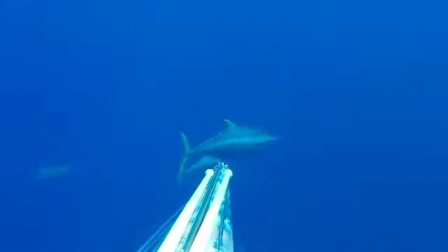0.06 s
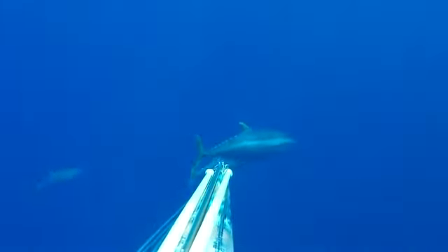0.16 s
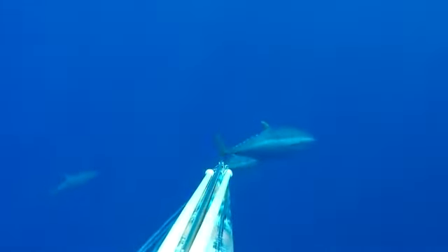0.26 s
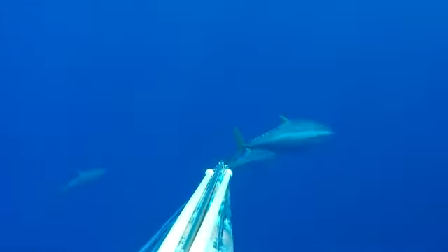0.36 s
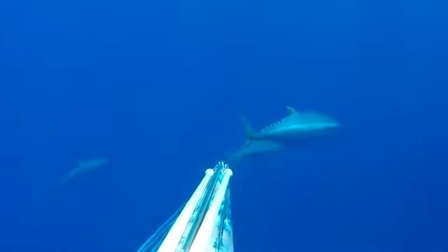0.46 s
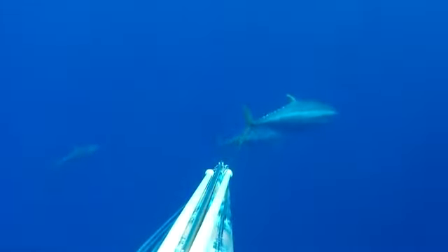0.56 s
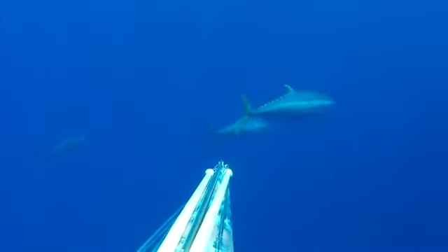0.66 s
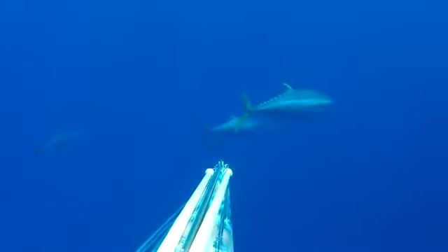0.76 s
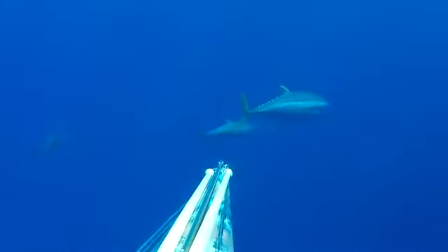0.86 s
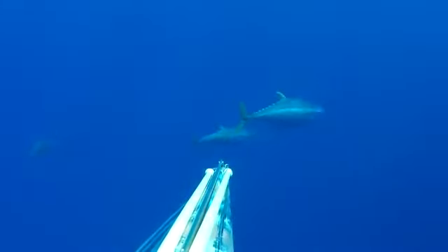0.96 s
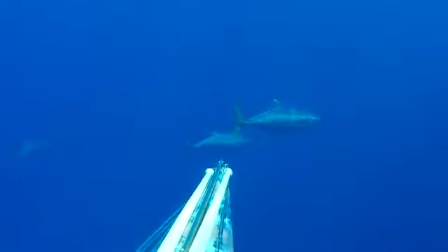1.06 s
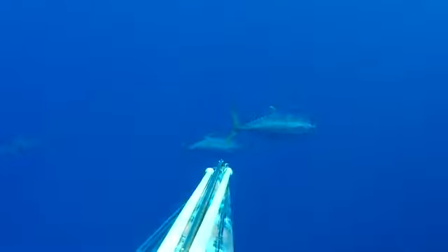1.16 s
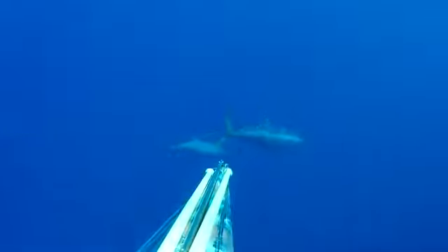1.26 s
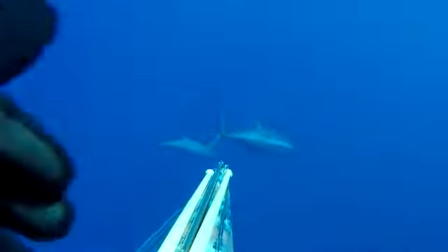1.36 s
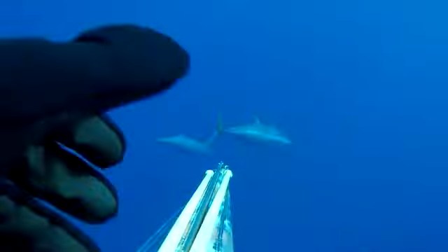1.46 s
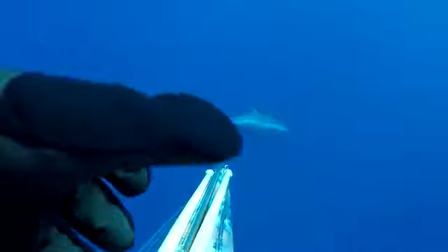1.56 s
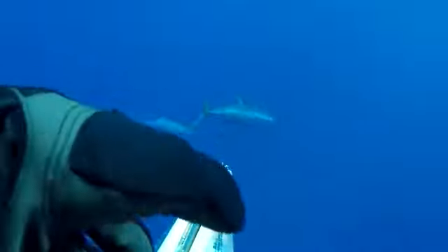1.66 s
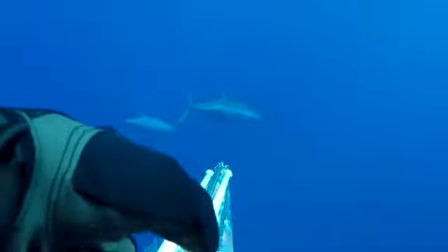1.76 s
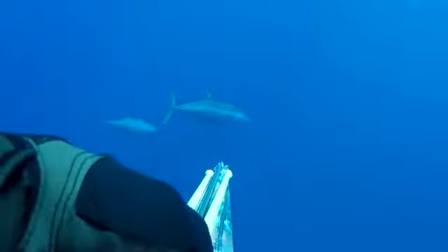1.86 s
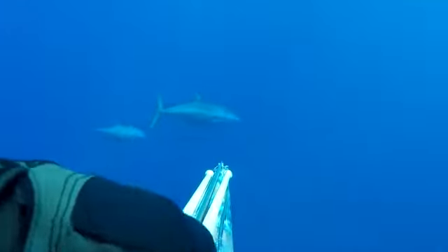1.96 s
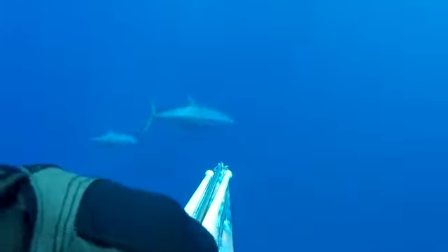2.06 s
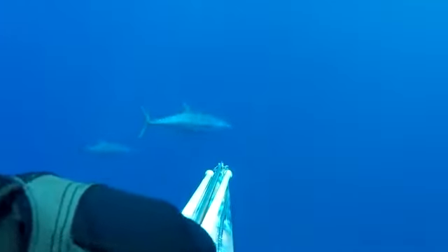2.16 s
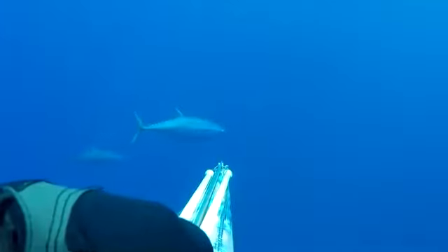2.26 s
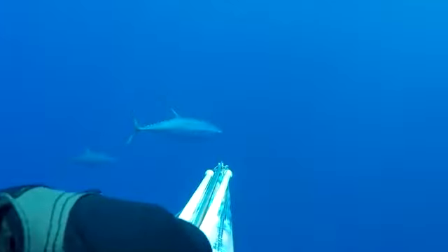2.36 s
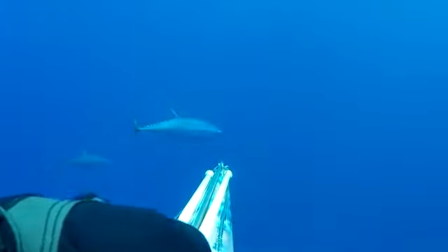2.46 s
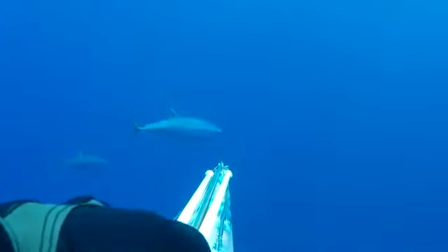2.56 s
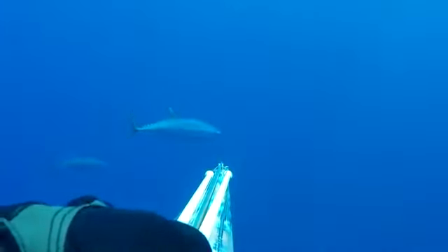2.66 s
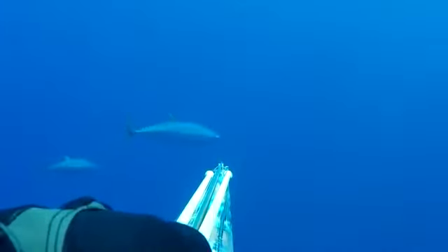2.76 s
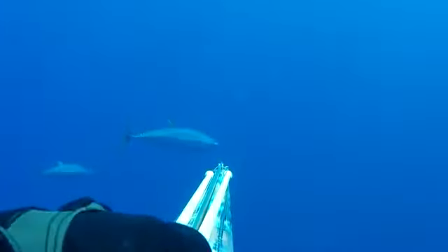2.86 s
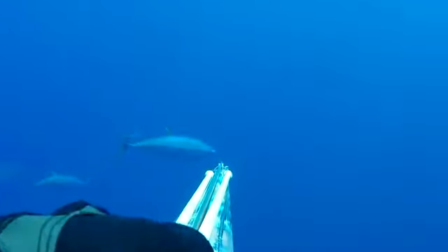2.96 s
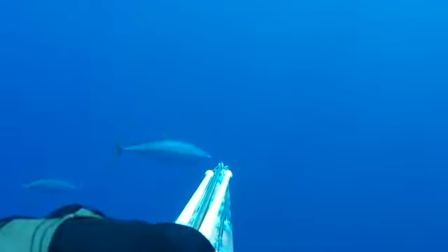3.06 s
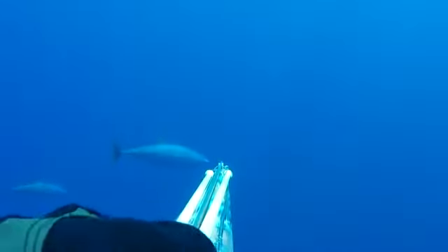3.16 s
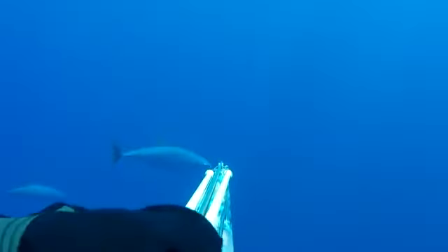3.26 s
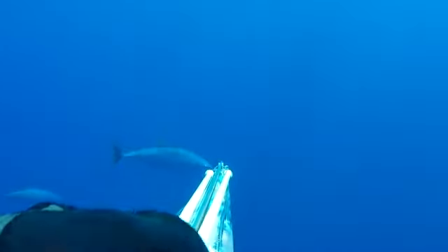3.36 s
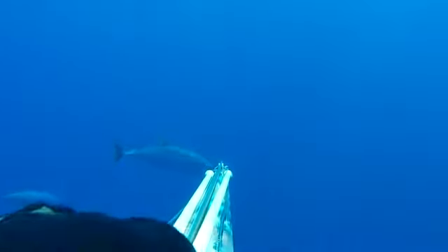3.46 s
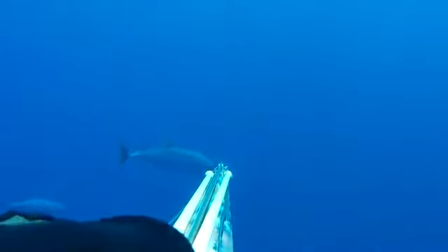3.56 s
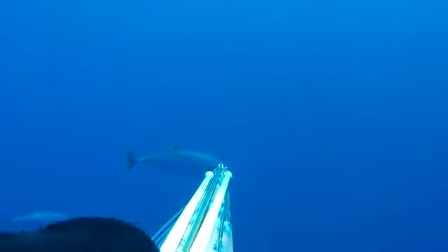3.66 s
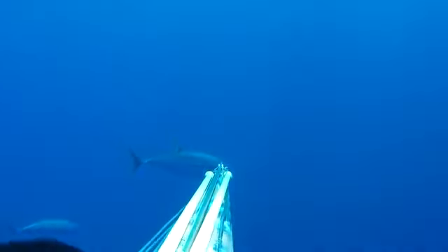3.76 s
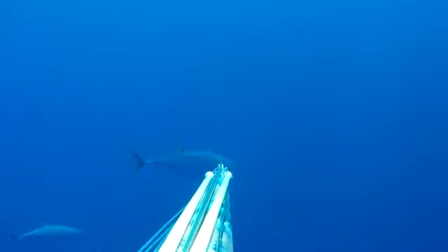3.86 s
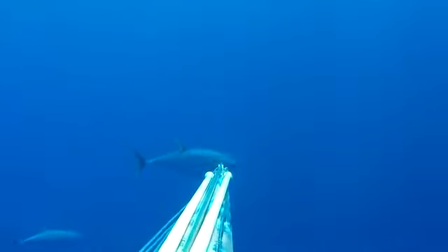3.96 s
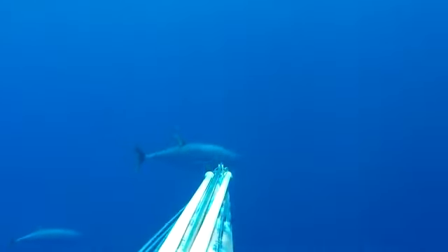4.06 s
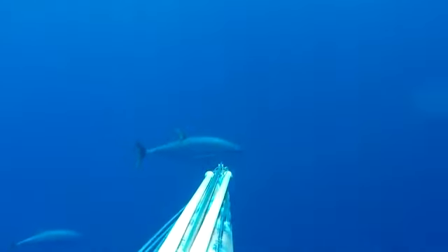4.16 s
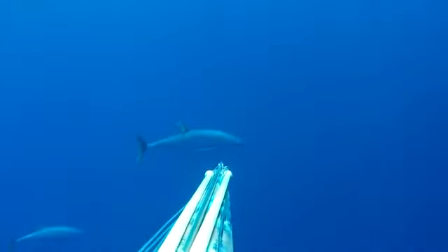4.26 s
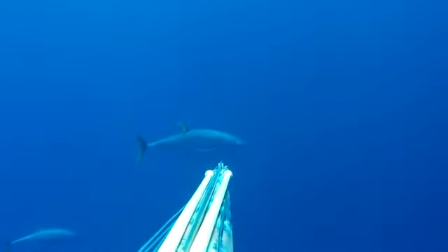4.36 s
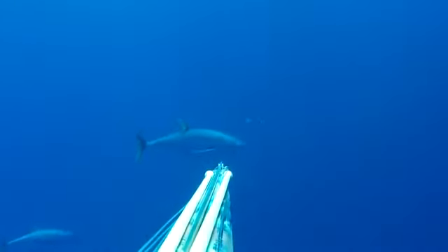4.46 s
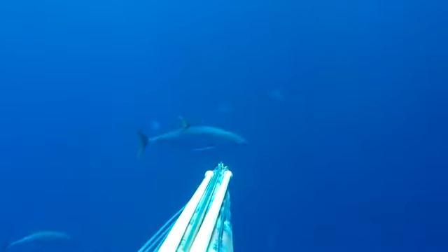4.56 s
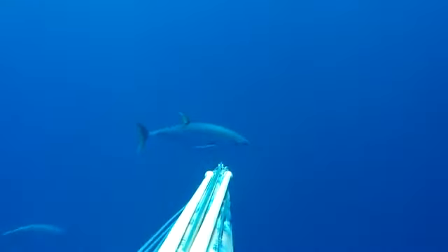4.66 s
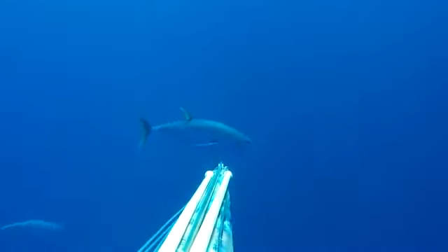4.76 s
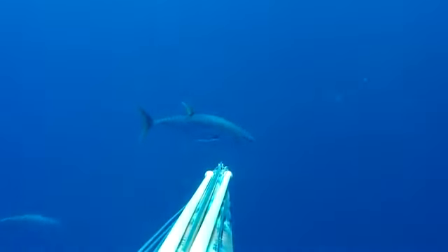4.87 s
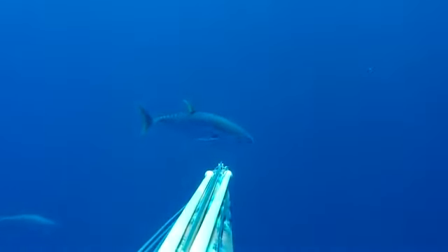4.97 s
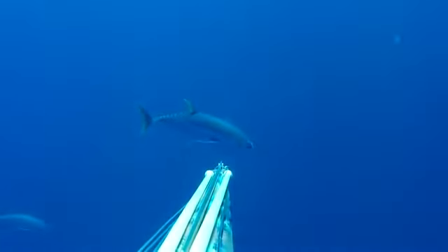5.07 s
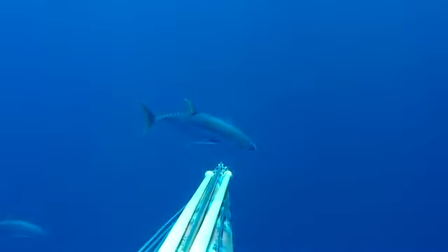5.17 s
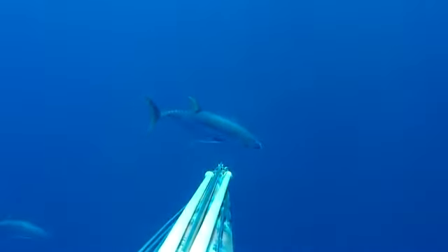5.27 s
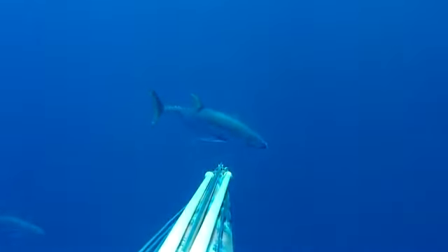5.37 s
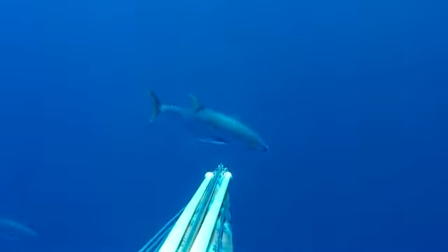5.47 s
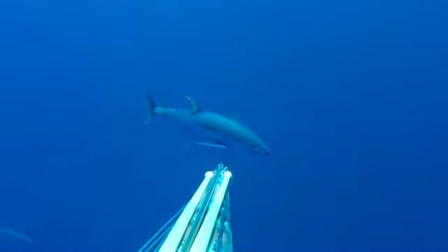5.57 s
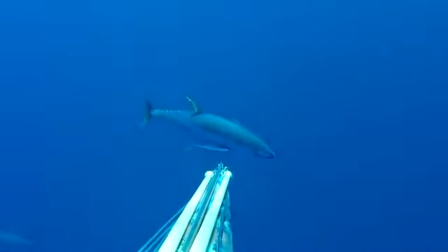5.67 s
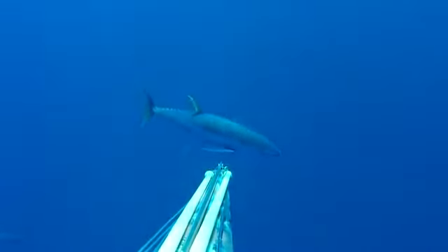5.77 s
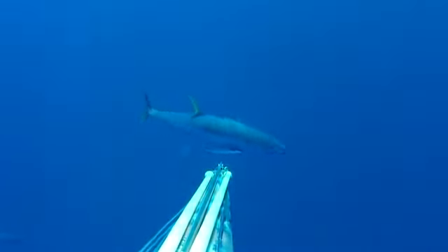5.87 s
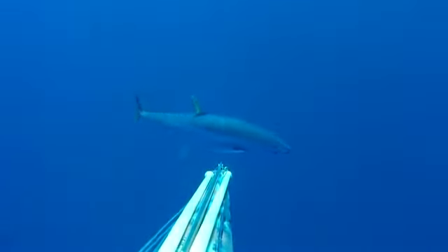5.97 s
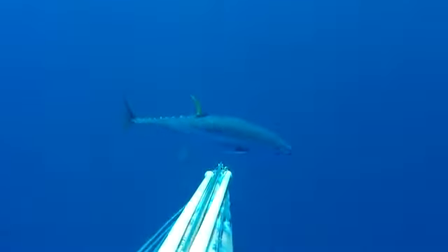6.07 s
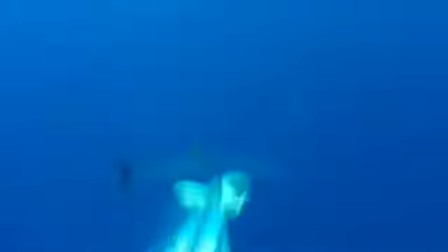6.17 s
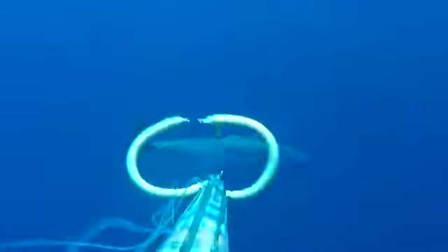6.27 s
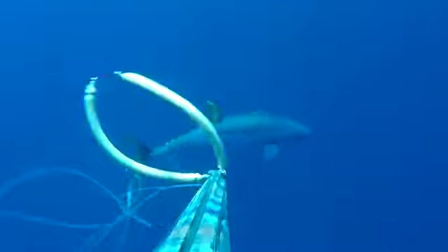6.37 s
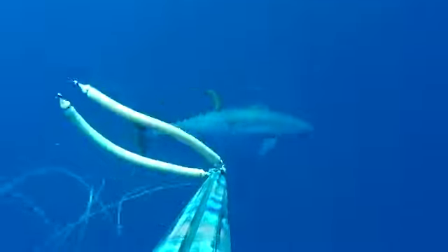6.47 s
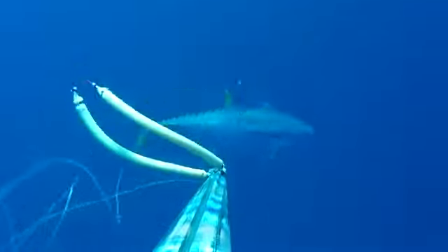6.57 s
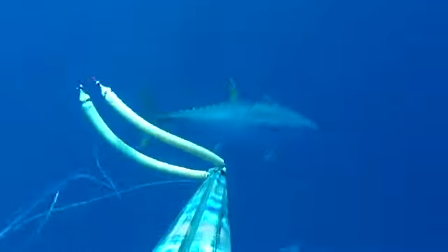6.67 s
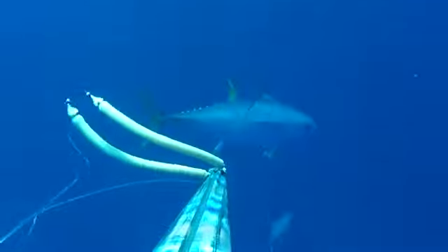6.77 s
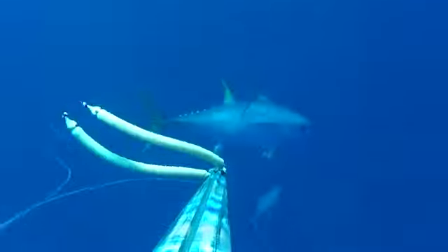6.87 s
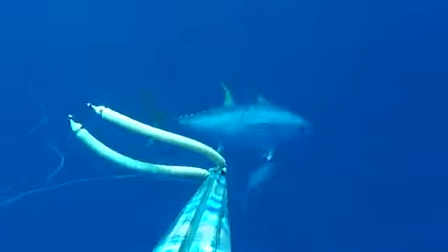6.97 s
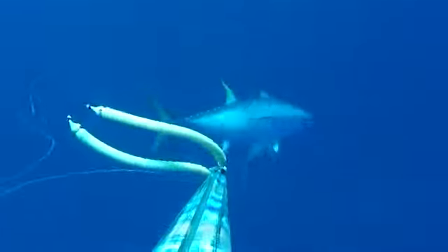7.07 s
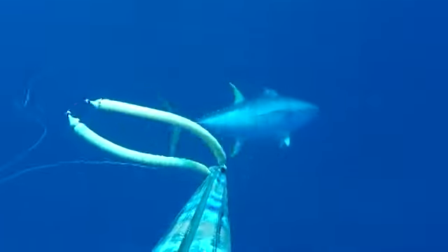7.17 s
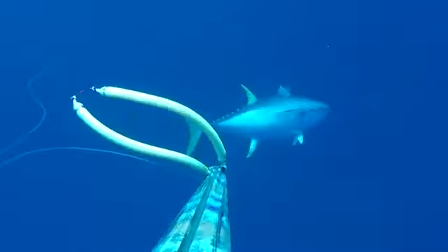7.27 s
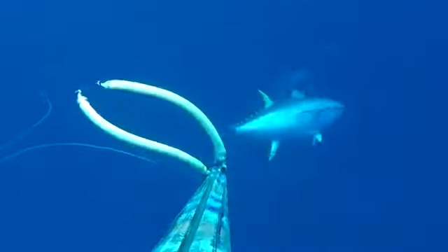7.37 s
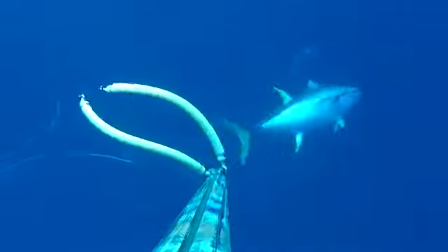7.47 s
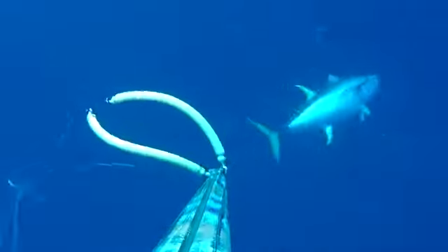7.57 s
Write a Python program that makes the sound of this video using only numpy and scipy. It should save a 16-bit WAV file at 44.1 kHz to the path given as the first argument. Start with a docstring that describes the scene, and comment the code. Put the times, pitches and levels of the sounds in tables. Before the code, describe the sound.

Low underwater rumble with small crackles and close glove knocks, then a speargun fires with a loud crack and a clacking rattle.

```python
"""Open water, below the surface: a diver aims a speargun, the microphone in a sealed housing on the gun.
Flow rumbles and gurgles on the housing; farther out the sea hisses, crackles and snaps through its wall.
Right at the microphone a gloved hand knocks and rubs the gun, among dull thuds and bubble-like pings.
The trigger clicks, the spear tears along the barrel, the gun kicks, and loose bands and line clack.
The shot overloads the recorder, whose gain control ducks everything and slowly recovers."""
import sys
import numpy as np
from scipy import signal
from scipy.fft import rfft, irfft, next_fast_len
from scipy.io import wavfile
from scipy.ndimage import uniform_filter1d, minimum_filter1d

SR = 44100
rng = np.random.default_rng(int(sys.argv[2]) if len(sys.argv) > 2 else 0)


def output_pcm(signal):
    """Save a mono or channel-first signal as 16-bit PCM at the path in sys.argv[1].

    Samples are clipped to [-1, 1] before scaling.
    """
    pcm = np.clip(np.atleast_2d(signal).T, -1, 1) * 32767
    wavfile.write(sys.argv[1], SR, np.round(pcm).astype(np.int16))


N = 336036
KNOCK_SAMPLES = 6000

# Modes of gun and housing. Each row: pitch in Hz, relative level in dB, free ring time (t60) in seconds.
GUN_MODES = [(358, -23, 0.072), (484, -18.5, 0.0073), (646, -6.5, 0.22), (736, -5, 0.1), (944, -13, 0.18),
             (994, -6, 0.092), (1230, -21.5, 0.011), (1550, 2.5, 0.022), (1770, 4, 0.042),
             (1950, -2, 0.025), (2250, -10, 0.024), (2900, -4.5, 0.035), (3130, -12, 0.061),
             (3920, -12.5, 0.026), (4600, -28, 0.0052), (5950, -26.5, 0.042), (6800, -31.5, 0.014),
             (8500, -33.5, 0.0065), (10500, -35, 0.006), (12980, -31, 0.005)]
# Knocks, rubs and tearing are kept above the gun's first modes, and the housing dulls their top.
GUN_BAND = signal.butter(2, [560, 9000], "band", fs=SR, output="sos")


def from_db(db):
    """Gain of a level in dB."""
    return 10 ** (np.asarray(db, float) / 20)


def rms_one(x):
    """Scale to rms 1."""
    return x / np.sqrt(np.mean(x ** 2) + 1e-20)


def add(out, s, sound):
    """Mix a short sound in at s seconds."""
    at = round(s * SR)
    out[at:at + len(sound)] += sound[:N - at]


def in_time(rows):
    """Columns of a curve table, one value a sample."""
    s, *columns = np.transpose(rows)
    return [np.interp(np.arange(N) / SR, s, c) for c in columns]


def coloured(x, spectrum):
    """Give a white signal a spectrum, by the causal filter of least delay; rms 1."""
    hz, db = np.transpose(spectrum)
    size = 2 * next_fast_len(N // 2 + 1, True)
    log_hz = np.log(np.arange(size // 2 + 1) * SR / size + 1e-3)
    gain = from_db(np.interp(log_hz, np.log(hz), db, -70, -70))
    cepstrum = irfft(np.log(gain), size)
    cepstrum[1:size // 2] *= 2
    cepstrum[size // 2 + 1:] = 0
    return rms_one(irfft(rfft(x, size) * np.exp(rfft(cepstrum)), size)[:N])


def drift(rate_hz):
    """Slow random wander of spread 1."""
    r = np.exp(-80 * np.pi * rate_hz / SR)   # one step every 40 samples
    slow = signal.lfilter([1], [1, -2 * r, r * r], rng.standard_normal(N // 40 + 2002))[2000:]
    return np.interp(np.arange(N) / 40, np.arange(len(slow)), rms_one(slow))


def grains(per_s, spread_db):
    """Random clicks, most small and a few large; rms 1."""
    sizes = from_db(spread_db * np.minimum(rng.exponential(1, N), 4))
    signs = np.sign(rng.standard_normal(N))
    return rms_one(sizes * signs * (rng.random(N) < per_s / SR))


def ring(clicks, hz, t60):
    """A unit click sets a sine of height 1 ringing."""
    r, w = from_db(-60 / (t60 * SR)), 2 * np.pi * hz / SR
    return signal.lfilter([0, np.sin(w)], [1, -2 * r * np.cos(w), r * r], clicks + 1e-18)


def through_wall(x):
    """The housing wall passes little at its antiresonances: each cuts a narrow dip."""
    # Each row: centre in Hz, width in Hz, depth in dB.
    dips = [(1950, 120, -12), (3390, 150, -14), (4250, 350, -7), (5150, 250, -7), (5580, 160, -8),
            (6400, 400, -6), (7900, 500, -5)]
    for hz, width_hz, db in dips:
        x = x - (1 - from_db(db)) * signal.lfilter(*signal.iirpeak(hz, hz / width_hz, SR), x)
    return x


def knocks(rows, chatter_ms):
    """Contacts chatter into randomly detuned modes; each knock has its level, ring length and colour."""
    out, age = np.zeros(N), np.arange(KNOCK_SAMPLES) / SR
    hz, mode_db, t60 = np.transpose(GUN_MODES)[:, :, None]
    for s, peak_db, db_per_octave, ring_share, centre_hz in rows:
        strength, detune = rng.standard_normal((2, len(hz), 1))
        colour_db = db_per_octave * np.log2(hz / 1000) + 3 * strength
        if centre_hz:
            colour_db -= 22 * np.log2(hz / centre_hz) ** 2   # 22 dB down an octave away
        fading = from_db(mode_db + colour_db - 60 * age / (t60 * ring_share))
        modes = np.sum(np.sin(2 * np.pi * hz * (1 + .015 * detune) * age) * fading, axis=0)
        touch = rng.standard_normal(KNOCK_SAMPLES)
        chatter = touch * np.abs(touch) * age ** .3 * np.exp(-2000 * age / chatter_ms)
        knock = signal.sosfilt(GUN_BAND, signal.fftconvolve(chatter, modes)[:KNOCK_SAMPLES])
        add(out, s, from_db(peak_db) * knock / np.abs(knock).max())
    return out


def struck(rows, rise_cycles, rough):
    """Each row sets one mode swinging; it needs a moment to build up, and a rough one flutters."""
    out, age = np.zeros(N), np.arange(SR) / SR
    for s, db, hz, t60 in rows:
        rise = 1 - np.exp(-age * hz / rise_cycles)
        flutter = 1 + rough * rms_one(uniform_filter1d(rng.standard_normal(SR), size=110))
        add(out, s, rise * flutter * from_db(db - 60 * age / t60) * np.sin(2 * np.pi * hz * age))
    return out


def scrape(rows, contacts, attack_s, release_s, ring_share=1):
    """Strokes swell and fade, feeding contacts into the modes; returns ringing and bare contacts."""
    ringing, bare = np.zeros(N), np.zeros(N)
    for s, length_s, level_db, db_per_octave in rows:
        stroke = contacts[round(s * SR):round((s + length_s) * SR) + 2 * KNOCK_SAMPLES]
        age = np.arange(len(stroke)) / SR
        swell = np.minimum(age / attack_s, 1) * np.exp(-np.maximum(age - length_s, 0) / release_s)
        stroke = stroke * from_db(level_db) * swell
        add(bare, s, stroke)
        for hz, db, t60 in GUN_MODES:
            gain = from_db(db + db_per_octave * np.log2(hz / 1000))
            add(ringing, s, gain * ring(stroke, hz, ring_share * t60))
    return signal.sosfilt(GUN_BAND, signal.sosfilt(GUN_BAND, ringing)), bare


def water_flow():
    """Water passing right over the housing: a surging rumble, a patchy wash and a gurgle."""
    # Each row: time in seconds, rumble in dB, wash in dB, extra bass of the wash in dB.
    flow = [(0.0, -26, -61.5, -21), (0.15, -21, -53, -2), (0.5, -24.5, -57, -4), (1.03, -35, -55, 4),
            (1.17, -21, -59.5, 1.5), (1.42, -30.5, -52, -5), (2.2, -25.5, -58.5, 4.5),
            (2.6, -33, -61.5, 3.5), (3.3, -28, -56, 2), (3.5, -30.5, -57, -0.5), (3.9, -24, -52.5, 1),
            (4.18, -23, -51.5, 8), (4.5, -27.5, -54, 1.5), (5.27, -20.5, -51.5, 3.3),
            (5.55, -27, -46.5, 4.5), (5.68, -21, -45.5, 2), (5.82, -32.5, -50.5, 4.5),
            (6.03, -17, -47.5, -0.5), (6.2, -27.5, -46.5, -1), (6.75, -24.5, -39, -5.5),
            (7.2, -20.5, -48.5, 7.7), (7.6, -26, -43.5, 5)]
    # Two spectra. Each row: frequency in Hz, relative density in dB.
    rumble_spectrum = [(4.7, -41), (8.0, -5.5), (22, 3.5), (34, 5.5), (45, -11), (70, -18), (130, -55),
                       (170, -71.5), (290, -120)]
    wash_spectrum = [(45, -31), (65, -1.5), (100, 0), (253, -12), (329, -17), (412, -20.5), (472, -15.5),
                     (541, -19), (694, -12.5), (932, -19), (1130, -27.5), (1370, -25), (1500, -32.5),
                     (1950, -54), (3300, -120)]
    rumble_db, wash_db, bass_db = in_time(flow)
    sway = coloured(rng.standard_normal(N), rumble_spectrum)
    sway = rms_one(sway / uniform_filter1d(sway ** 2, size=3500) ** .27)   # keeps the swing rather even
    eddies = coloured(rng.standard_normal(N) * from_db(2.2 * drift(rate_hz=0.82)), wash_spectrum)
    bass = signal.sosfilt(signal.butter(1, 300, fs=SR, output="sos"), eddies)
    wash = from_db(wash_db) * (eddies + (from_db(bass_db) - 1) * bass)
    rumble = from_db(rumble_db + 1.5 * drift(rate_hz=5)) * sway
    gurgle_db = -63.5 + 0.36 * (wash_db - wash_db.mean())
    return rumble + wash + from_db(gurgle_db) * gurgle()


def gurgle():
    """Small bubbles come at random, each ringing briefly at one of ten pitches; rms 1."""
    births, which = grains(per_s=90, spread_db=8), rng.integers(0, 10, N)
    pitches = np.geomspace(450, 1400, num=10)
    return rms_one(sum(ring(births * (which == k), hz, 25 / hz) for k, hz in enumerate(pitches)))


def sea_hiss():
    """The sea all around fizzes and crackles through the housing wall, drifting to a thinner colour."""
    # Each row: time in seconds, level in dB, share of the thin colour from 0 to 1.
    hiss = [(0.0, -48, 0), (1.3, -48.5, 0.05), (2.04, -46.5, 0.05), (3.81, -46.5, 0.13),
            (4.35, -48.5, 0.22), (6.1, -46, 0.42), (6.6, -47, .95), (6.8, -42.5, 0.83), (7.6, -44.5, 0.7)]
    # The two colours. Each row: frequency in Hz, relative density in dB.
    full_spectrum = [(710, -59.5), (1200, -30), (1760, -6), (1920, -8.5), (2570, -0.5), (3390, -3),
                     (3810, 3.5), (4240, -5.5), (6040, -5), (7730, -10.5), (14400, -16), (15500, -25)]
    thin_spectrum = [(710, -25.5), (1200, -21), (1420, -12.5), (1860, -12), (2170, -1.5), (2550, -14),
                     (2930, -1), (3500, -6.5), (4150, -14), (4660, 0.5), (5000, -17.5), (5430, -12),
                     (5920, -2), (6300, -13.5), (6850, -4.5), (7570, -17), (8120, -10), (14500, -22),
                     (15500, -22.5)]
    hiss_db, thin_share = in_time(hiss)
    fizz = rng.standard_normal(N) * from_db(0.84 * drift(rate_hz=30) + drift(rate_hz=6.9))
    fizz += from_db(-5) * crackle(per_s=200 * from_db(5.5 * drift(rate_hz=12)))
    full = through_wall(coloured(fizz, full_spectrum))
    thin = coloured(fizz, thin_spectrum)
    return from_db(hiss_db) * ((1 - thin_share) * full + thin_share * thin)


def crackle(per_s):
    """Far pops, each ringing a few cycles at one of seven pitches; rms 1."""
    births, which = grains(per_s, spread_db=2.5), rng.integers(0, 7, N)
    pitches = np.geomspace(2300, 12500, num=7)
    pops = sum(ring(births * (which == k), hz, 11 / hz) * hz ** .65 for k, hz in enumerate(pitches))
    return rms_one(pops)


def glove_knocks():
    """The glove knocks on the gun, close to the microphone, and the modes ring briefly."""
    # Each row: start in seconds, peak in dB, brightness in dB per octave.
    blows = [(0.054, -36, -1), (0.215, -30, -2), (0.237, -21, -9), (0.268, -36, -25), (0.525, -38, 1),
             (0.56, -23.5, -1), (0.575, -28, -11), (0.797, -36, -18), (0.81, -45, 6), (0.838, -31.5, -7),
             (0.882, -34.5, -17), (0.918, -36.5, -14), (0.985, -50, 4), (1.002, -30.5, -15),
             (1.03, -30, -17), (1.092, -20, 0), (1.101, -31.5, 3), (1.119, -24.5, -23), (1.215, -33.5, 9),
             (1.238, -30.5, -18), (1.344, -39, -7), (1.615, -30, -2), (1.643, -31, -3), (1.675, -25.5, -3),
             (1.691, -36, -7), (1.7, -31, -1), (1.705, -20.5, -1.5), (1.72, -33, -18), (2.544, -36, -10.5),
             (2.78, -38, 7), (3.345, -43, -16), (3.923, -38.5, -13), (4.328, -40, -13), (4.372, -37, -1),
             (4.43, -36, 7), (4.698, -42.5, -24), (4.986, -39, -1), (5.333, -35, -7), (5.799, -38.5, -1),
             (6.108, -38.5, -11), (7.229, -40, 10)]
    ring_share = .7
    return knocks([(*row, ring_share, None) for row in blows], chatter_ms=7)


def snaps():
    """Sharp snaps out in the water: a puff of noise with a crack of treble, both gone at once."""
    # Each row: start in seconds, puff level in dB, puff centre in Hz, crack level in dB.
    events = [(0.0774, -33, 3530, -57), (0.234, -49, 2920, -65), (0.3447, -35.5, 2680, -50),
              (0.557, -26.5, 2900, -64), (0.8335, -36, 4000, -48), (1.093, -37, 3160, -54),
              (1.7015, -50, 3000, -66), (1.7628, -35, 3000, -63), (1.779, -35, 2600, -62),
              (1.942, -35, 3800, -56), (2.16, -30.5, 3360, -73), (2.205, -31, 3750, -64),
              (2.23, -36, 3800, -62), (2.389, -33.5, 2740, -62), (2.6181, -32.5, 3420, -62),
              (2.807, -37, 3130, -61), (2.83, -38, 3800, -58), (2.861, -36, 3800, -60),
              (3.1532, -51, 3840, -62), (3.3397, -33.5, 3340, -62), (3.651, -42, 3240, -42.5),
              (3.809, -33.5, 3150, -60), (3.8375, -33, 3730, -56), (3.9, -38, 2870, -44),
              (3.972, -43, 2840, -44), (4.5491, -33, 3970, -45), (4.6224, -36, 3270, -44),
              (4.682, -37, 3160, -51), (5.102, -31, 5370, -68), (5.242, -34, 3230, -54),
              (5.368, -28, 2840, -49), (5.5617, -34, 3140, -64), (5.624, -30, 3130, -47),
              (5.8695, -30, 4530, -63), (6.101, -48, 3160, -42.5), (6.79, -31, 3060, -52),
              (7.118, -33, 4600, -48), (7.182, -36, 6800, -43.5), (7.338, -29, 6000, -48.5)]
    t60_s, crack_hz = 0.033, 8000
    out, age = np.zeros(N), np.arange(1500) / SR
    for s, db, hz, crack_db in events:
        burst = rng.standard_normal(len(age)) + 8 * (age == 0)   # the first instant is the hardest
        puff = rms_one(signal.lfilter(*signal.iirpeak(hz, 5, SR), burst)) / 2
        crack = rms_one(signal.lfilter(*signal.iirpeak(crack_hz, 1.3, SR), burst))
        add(out, s, (from_db(db) * puff + from_db(crack_db) * crack) * from_db(-60 * age / t60_s))
    return through_wall(out)


def pings():
    """Single fluttering tones, like small bubbles let go."""
    # Each row: start in seconds, level in dB, pitch in Hz, t60 in seconds.
    tones = [(0.138, -25.5, 946, 0.084), (0.481, -15.5, 1540, 0.016), (0.488, -27, 1230, 0.065),
             (1.646, 1.5, 646, 0.013), (3.94, -22, 1770, 0.024), (4.376, -32.5, 1720, 0.041),
             (4.906, -19.5, 1740, 0.021), (5.695, -34.5, 736, 0.091), (5.748, -27.5, 1150, 0.018),
             (5.8, -34, 990, 0.042), (6.01, -25, 1230, 0.02), (6.112, -36, 1270, 0.026),
             (6.5, -12, 281, 0.043), (6.605, -25, 391, 0.15), (6.727, -22, 1030, 0.034),
             (6.771, -27, 1200, 0.029), (7.001, -28.5, 1020, 0.045), (7.074, -33, 992, 0.042),
             (7.236, -36.5, 982, 0.041), (7.485, -33.5, 1750, 0.023)]
    return struck(tones, rise_cycles=5, rough=.3)


def glove_rubs():
    """The glove sticks and slips along the gun; the gun rings and the air in the housing booms."""
    # Each row: start and length in seconds, drive to the gun in dB, brightness in dB per octave,
    # drive to the housing's air in dB.
    rubs = [(0.172, 0.032, -69.5, -0.5, -97), (0.445, 0.044, -65, -4, -96), (0.555, 0.033, -79, -6, -70),
            (0.813, 0.19, -83, 5, -107), (0.965, 0.057, -66.5, -5, -99), (1.081, 0.13, -68, -5.5, -65),
            (1.2, 0.028, -90, -13, -76), (1.583, 0.21, -72, -8, -74), (2.43, 0.026, -83, -21, -102),
            (6.57, 0.052, -73.5, 5.5, -85)]
    slips = grains(per_s=900, spread_db=3.5)
    attack_s, release_s = 0.028, 0.05
    rubbing, _ = scrape([row[:4] for row in rubs], slips, attack_s, release_s, ring_share=0.53)
    air_strokes = [(s, length_s, air_db, 0) for s, length_s, _, _, air_db in rubs]
    _, push = scrape(air_strokes, slips, attack_s, release_s)
    # Each row: pitch in Hz, relative level in dB, t60 in seconds.
    air_modes = [(121, 0, 0.14), (210.6, -9.5, 0.21), (235, -21, 0.078), (333, -15, 0.16)]
    return rubbing + sum(from_db(db) * ring(push, hz, t60) for hz, db, t60 in air_modes)


def housing_thuds():
    """Dull thuds on the housing itself: one low mode that dies quickly."""
    # Each row: start in seconds, level in dB.
    thuds = [(0.218, -28), (0.237, -24.5), (0.56, -31), (1.095, -33), (1.118, -27), (1.591, -29),
             (1.705, -67), (2.349, -14), (2.741, -19.5), (4.374, -22.5), (6.01, -50), (6.241, -10),
             (7.232, -31), (7.344, -21)]
    hz, t60_s = 126, 0.026
    return struck([(s, db, hz, t60_s) for s, db in thuds], rise_cycles=0.22, rough=0.055)


def clacks():
    """A few dry ticks, the trigger, and loose bands and line clacking on the barrel."""
    # Each row: start in seconds, peak in dB, share of the free ring time, centre in Hz.
    hits = [(1.758, -34, 0.37, 1770), (6.236, -15, 0.13, 4500), (6.238, -6, 0.1, 920),
            (6.239, -11.5, .2, 2500), (6.282, -21, .3, 3000), (6.288, -5, .4, 1600),
            (6.291, -1.5, 0.4, 4330), (6.292, -17, .5, 11000), (6.302, -22, .5, 10000),
            (6.297, -10, .4, 1600), (6.301, -10, .3, 3000), (6.307, -5, 0.19, 700), (6.318, -6, 0.34, 2300),
            (6.32, -0.5, 0.2, 1000), (6.332, -9, 0.22, 3000), (6.332, -5, 0.47, 1390),
            (6.331, -30, 0.36, 11000), (6.335, -16, .12, 6500), (6.336, -12, 0.46, 10100),
            (6.344, -26, .3, 11000), (6.345, -11, .2, 800), (6.354, -18, .25, 3000),
            (6.365, -15, .25, 2900), (6.369, -7, .4, 1400), (6.374, -24, 0.44, 8000),
            (6.376, -10, 0.34, 1800), (6.39, -9, 0.6, 10000), (6.386, -6, 0.69, 4040),
            (6.39, -13, .4, 2250), (6.389, -2.5, 0.18, 6140), (6.39, -10, 0.18, 900),
            (6.396, -8, 0.27, 2200), (6.397, 0, 0.13, 800), (6.424, -19, .3, 7000), (6.424, -13, .4, 2100),
            (6.427, -4, 0.24, 980), (6.435, -7, .4, 2300), (6.435, -29, 0.44, 7000),
            (6.442, -21, 0.35, 2400), (6.503, -18, 0.66, 1700), (6.506, -20, 0.32, 5950),
            (6.518, -15, .3, 5950), (6.518, -16, .3, 2500), (6.524, -10, .5, 1800), (6.528, -18, .3, 5950),
            (6.528, -15, .5, 2000), (6.531, -4, .4, 3000), (6.5363, -13, .5, 8500), (6.543, -24, .25, 5950),
            (6.5387, -1, 0.54, 3130), (6.541, -2, 0.74, 1820), (6.54, -14, .6, 1020),
            (6.544, -3, 0.25, 3000), (6.555, -13, .4, 3000), (7.298, -29.5, 0.18, 1310),
            (7.344, -20.5, 0.18, 760), (7.346, -23, .5, 2250), (7.346, -24, 0.2, 358)]
    return knocks([(s, db, 0, ring_share, hz) for s, db, ring_share, hz in hits], chatter_ms=2)


def recoil():
    """The spear clangs free, the gun kicks back, the slack bands yank it forward, and it swings out."""
    # Each row: start in seconds, level in dB, pitch in Hz, t60 in seconds.
    swings = [(6.2594, 7, 1830, .035), (6.2692, 4, 1750, .011), (6.282, -4, 730, .08),
              (6.285, -7, 810, .08), (6.2595, 3, 860, .04), (6.262, -5, 100, .25), (6.27, -12, 175, .25),
              (6.2608, 18, 46, .09), (6.287, 4.5, 19, .8)]
    return struck(swings, rise_cycles=.03, rough=.06)


def shot():
    """Spear, bands and line tear along the barrel; gripped hard, it rings dry. The bands churn water."""
    # Each row: start and length in seconds, drive in dB, brightness in dB per octave.
    tears = [(6.2602, 0.0027, -21, 3.5), (6.263, 0.0012, -23.5, 12.5), (6.268, 0.002, -22, -1.5),
             (6.279, 0.025, -37, -5), (6.305, 0.033, -31.5, -10), (6.35, 0.055, -38, -11),
             (6.41, 0.041, -58, 9), (6.46, 0.048, -63, 5.5), (6.515, 0.034, -50, 5.5)]
    contacts = grains(per_s=2500, spread_db=3)
    tearing, rush = scrape(tears, contacts, attack_s=.001, release_s=.003, ring_share=0.2)
    churn = signal.sosfilt(signal.butter(2, [100, 600], "band", fs=SR, output="sos"), rush)
    return through_wall(tearing) + from_db(19) * churn


def scene():
    """Water and gun reach the one microphone in the housing."""
    water = water_flow() + sea_hiss() + snaps()
    gun = glove_rubs() + shot() + glove_knocks() + clacks() + housing_thuds()
    return (water + gun + pings() + recoil())[None]


def record(dry):
    """Gain control turns down after an overload, holds, then creeps back; what it misses is clipped."""
    threshold_db, cut_per_db_over, range_db = -6.5, 5, 25.5
    hold_s, release_db_per_s, lag_s = 0.17, 20, .036
    ceiling, cutoff_hz = .89, 16300
    level_db = 20 * np.log10(np.abs(dry[0]) + 1e-9)
    wanted_db = np.clip(cut_per_db_over * (level_db - threshold_db), 0, range_db)
    hold = round(hold_s * SR)
    held_db = -minimum_filter1d(-wanted_db, hold | 1, origin=hold // 2)
    fall_db = release_db_per_s * np.arange(N) / SR
    cut_db = np.maximum.accumulate(held_db + fall_db) - fall_db
    r = np.exp(-1 / (lag_s * SR))   # two lags in a row: too late for the crack of the shot
    ducked = dry * from_db(-signal.lfilter([(1 - r) ** 2], [1, -2 * r, r * r], cut_db))
    clipped = ducked / (1 + np.abs(ducked / ceiling) ** 4) ** (1 / 4)
    return signal.sosfilt(signal.cheby2(12, 80, cutoff_hz, fs=SR, output="sos"), clipped)


dry = scene()
out = record(dry)
output_pcm(out)
```